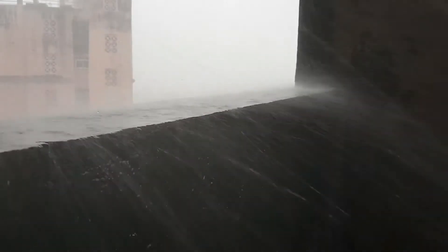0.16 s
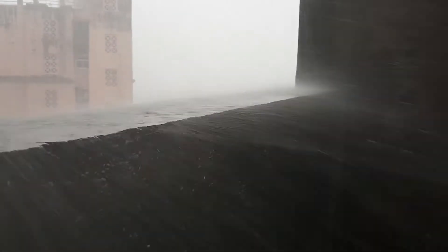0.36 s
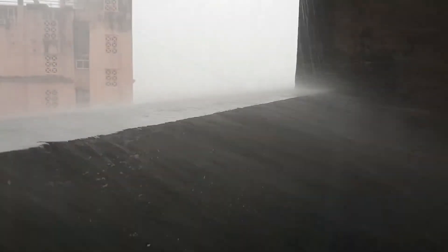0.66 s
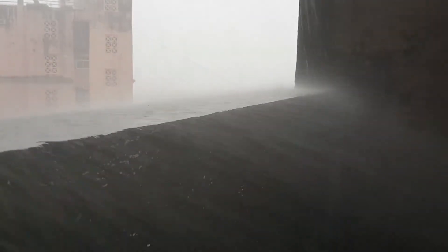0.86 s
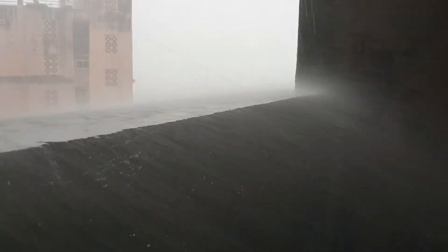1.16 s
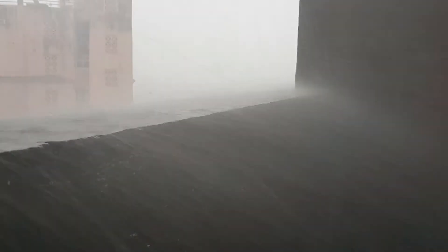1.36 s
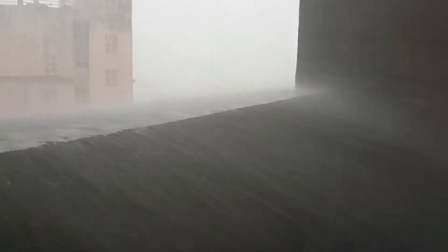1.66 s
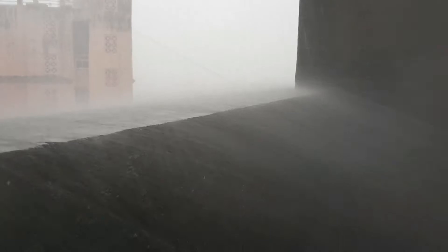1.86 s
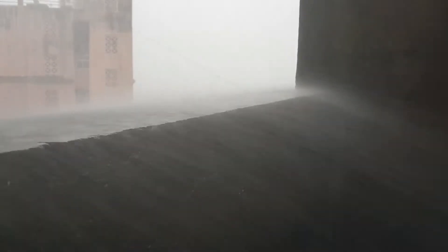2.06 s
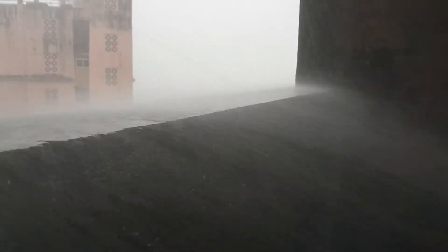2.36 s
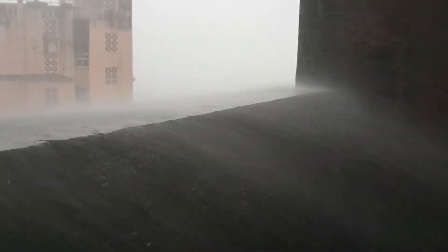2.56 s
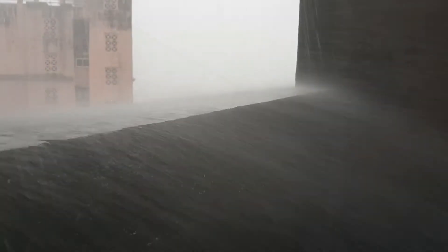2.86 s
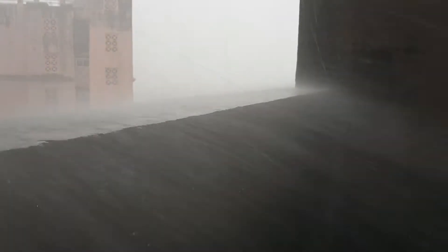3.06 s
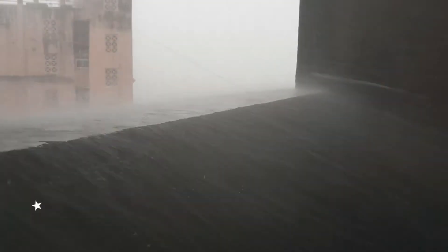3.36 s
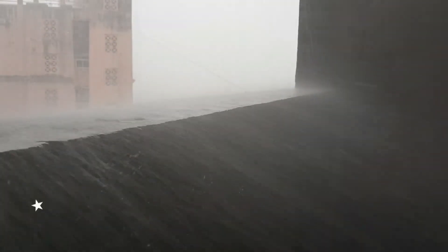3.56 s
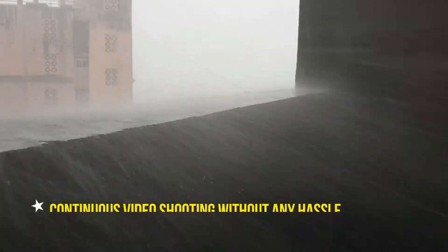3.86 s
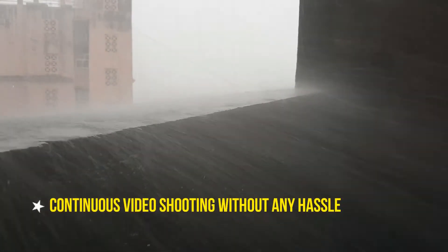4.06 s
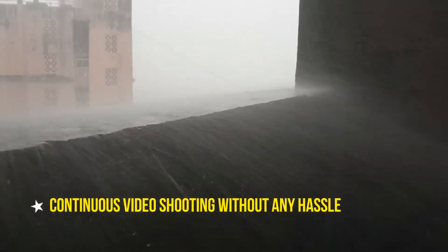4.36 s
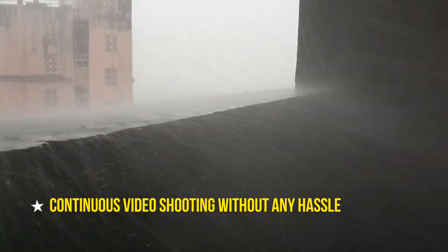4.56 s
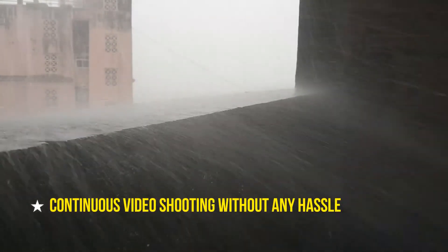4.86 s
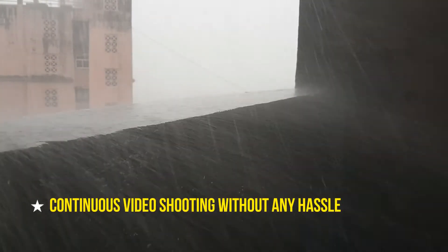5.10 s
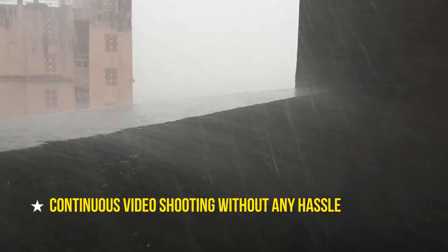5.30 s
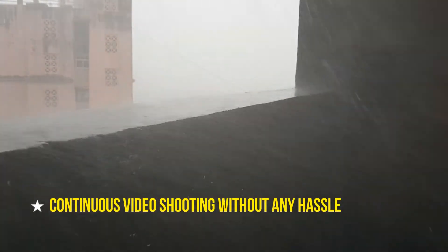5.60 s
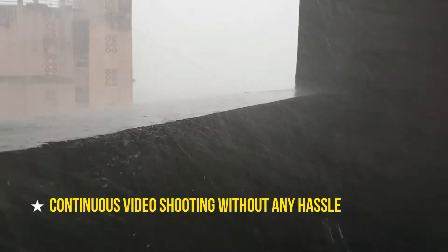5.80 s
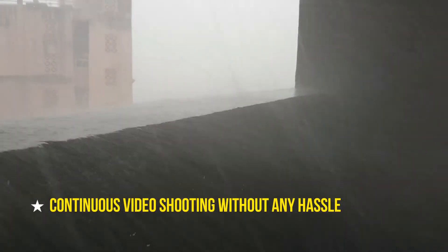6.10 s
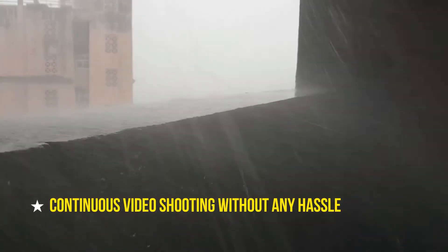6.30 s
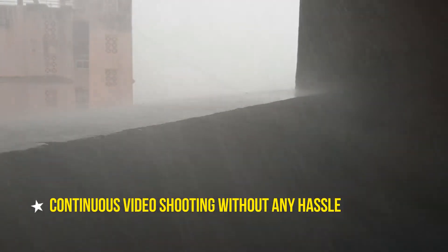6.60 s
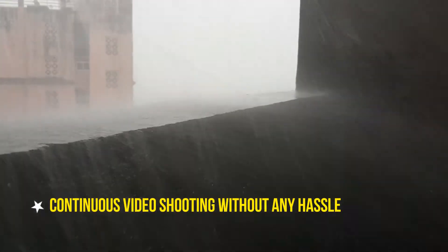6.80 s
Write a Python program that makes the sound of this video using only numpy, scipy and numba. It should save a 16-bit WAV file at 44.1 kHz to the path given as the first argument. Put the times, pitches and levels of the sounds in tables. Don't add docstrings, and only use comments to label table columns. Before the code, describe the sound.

Wind-driven rain batters a handheld microphone, low hollow drum-like plops and sharp overloaded ticks on the left over dull, lumpy gusty buffeting.

```python
import sys
import numpy as np
from scipy import signal
from scipy.io import wavfile
from scipy.ndimage import uniform_filter1d
from numba import njit

SR = 44100
rng = np.random.default_rng(int(sys.argv[2]) if len(sys.argv) > 2 else 0)


def volts_from_db(level):
    exponent = np.asarray(level, float) / 20
    return 10 ** exponent


def transcribe(signal):
    frames = np.atleast_2d(signal).T
    limited = np.clip(frames, -1, 1)
    pcm = np.round(limited * 32767).astype(np.int16)
    wavfile.write(sys.argv[1], SR, pcm)


N = 306054


# start_s, ringing_ms
BIG_DROPS_BUILDING = [(.2534, 16), (0.272, 4.5), (0.4729, 6.9), (0.4806, 7.6), (.659, 7.3), (0.9034, 8.6),
                      (1.5232, 11), (1.6677, 4.3), (1.8225, 9.6), (1.886, 6.1), (2.1928, 3.4),
                      (2.2124, 10.1), (2.229, 5.6), (2.305, 11), (2.3296, 9.5), (2.472, 6.3), (2.5481, 6),
                      (2.599, 5.9), (2.7543, 2.8), (2.9357, 4.5), (2.9819, 4.9), (3.0578, 0.47),
                      (3.0864, 2.8), (3.1275, 3.7), (3.2863, 1.8), (3.4542, 6.6), (3.5695, 4.6),
                      (3.6399, 4.3)]
# start_s, ringing_ms
BIG_DROPS_DOWNPOUR = [(4.251, 7.6), (4.2731, 13), (4.2945, 2.4), (4.3876, 7.3), (4.4929, 5.7),
                      (4.5845, 4.5), (4.5972, 10), (4.6875, 8.2), (4.7184, 25), (4.873, 7.9), (5.067, 8.8),
                      (5.1016, 7.2), (5.1284, 8), (5.179, 7.1), (5.2056, 9.7), (5.9039, 5.7), (5.9534, 14),
                      (5.9818, 11), (6.0044, 9.5), (6.14, 15), (6.164, 16), (6.1838, 10.5), (6.4322, 8.7),
                      (6.5043, 13), (6.5836, 10), (6.6862, 16), (6.731, 6.4), (6.8079, 8), (6.854, 8.4),
                      (6.873, 7.8)]
# start_s, blow_db, ringing_ms
MIDDLING_DROPS_EARLY = [(.5065, 10, 1.9), (.641, 9.5, 12), (0.6755, 12.5, 5), (1.001, 11.5, 8.7),
                        (1.008, 11, 4.1), (1.1583, 12, 2.7), (1.188, 11, 3.6), (1.4992, 13, 0.99),
                        (1.5507, 10.5, 5.1), (1.8552, 10.5, 54), (1.9003, 12, 2.1), (1.911, 4.5, 1.4),
                        (2.0923, 11, 8.5), (2.109, 11.5, 1.5), (2.1191, 11.5, 8.8), (2.142, 13, 2.1),
                        (2.1994, -2.5, 6.5), (2.378, 12.5, 6), (2.959, 13, 1.4), (2.9754, 14, 0.88),
                        (2.9993, 8.5, 2.7), (3.073, 12, 11), (3.1622, 9.5, 7.8), (3.2639, 11, 4.6),
                        (3.575, 9.5, 4.8), (3.982, 10.5, 1.7), (3.996, 10, 8), (4.1502, 13, 8),
                        (4.222, 13, 2.1), (4.3499, 10, 13)]
# start_s, blow_db, ringing_ms
MIDDLING_DROPS_LATE = [(4.4104, 2.5, 7.4), (4.418, 12, 3), (4.47, 12.5, 5), (4.7699, 10.5, 3.3),
                       (4.9838, 12.5, 7.7), (5.0377, 11.5, 18), (5.0554, 9.5, 3.9), (5.1575, 13.5, 5.4),
                       (5.438, 8.5, 2.5), (5.4472, 12.5, 6.5), (5.4853, 12.5, 1.8), (5.5303, 10, 18),
                       (5.5583, 10, 8), (5.585, 12.5, 5.7), (5.684, 13, 7.5), (5.8209, 12, 8.6),
                       (5.8697, 12, 4.5), (5.8785, 15, 5.1), (5.8974, 12.5, 8.6), (5.9923, 16, 4.3),
                       (6.36, 9.5, 1.6), (6.417, 10, 23), (6.4414, 14, 41), (6.5203, 12, 3.8),
                       (6.601, 14, 6.8), (6.6094, 15.5, 5.3), (6.6482, 14, 1.6), (6.6573, 11, 22),
                       (6.7738, 13, 2.4), (6.7869, 9, 6.1)]


def left_slapping_drops():
    big = np.array(BIG_DROPS_BUILDING + BIG_DROPS_DOWNPOUR)
    start_s, ringing_ms = big.T
    blow_db = 15.5 + np.exp(-ringing_ms / 3.78) + 0.42 * rng.standard_normal(len(big))
    big_rows = np.transpose([start_s, blow_db, ringing_ms])
    rows = np.vstack([big_rows, MIDDLING_DROPS_EARLY, MIDDLING_DROPS_LATE])
    return rows[np.argsort(rows[:, 0])].T


# start_s, blow_db
LIGHT_DROPS_EARLY = [(.1269, 1.5), (.168, 7.5), (.3905, -4), (.4483, 2), (.591, 4.5), (.7419, 6),
                     (.7563, 7), (.7848, 10), (.9778, 10.5), (1.1053, 6), (1.2129, 8), (1.231, -1.5),
                     (1.2547, 7), (1.3676, 5), (1.427, 8.5), (1.4895, 5.5), (1.592, 9), (1.6318, 4.5),
                     (1.718, 11.5), (1.7771, 9), (1.8116, 2.5), (1.9209, 14.5), (2.0098, 7), (2.1692, 7),
                     (2.255, 5.5), (2.459, 6), (2.515, 4.5), (2.6404, 3), (2.7245, 4), (2.825, 9)]
# start_s, blow_db
LIGHT_DROPS_LATE = [(3.2462, 5.5), (3.3, 9), (3.3266, 7), (3.365, 1.5), (3.4107, 1.5), (3.4258, 9),
                    (3.5367, 3.5), (3.7336, 8.5), (3.9687, 9.5), (4.0638, 2), (4.368, 10), (4.5408, 7.5),
                    (4.614, 9), (4.7981, 8), (4.8333, 6.5), (4.8995, 4.5), (4.968, 4), (5.2856, 10.5),
                    (5.3408, 8.5), (5.466, 15.5), (5.508, 15), (5.6214, 1.5), (5.6551, 5), (5.6746, 10),
                    (5.772, 5), (6.0458, 11), (6.425, 10.5), (6.4888, 6), (6.5453, 14), (6.5718, 20)]
FAINT_DROPS = [.026, .054, .134, .2985, .323, .7253, 1.4501, 1.4712, 1.5837, 1.6521, 1.9791, 2.0263, 2.6829,
               2.9265, 3.114, 3.1791, 3.6574, 3.692, 3.7067, 3.7151, 3.9019, 3.9293, 4.0256, 4.0536, 4.0842,
               4.1155, 4.632, 5.2297, 5.2668, 5.3721]
MORE_FAINT_DROPS = [.211, .3764, 1.3975, 1.6879, 1.7883, 1.994, 2.1521, 2.4944, 2.61, 3.31, 3.6459, 4.008,
                    4.1437, 4.3047, 4.3268, 4.5614, 4.6223, 4.7432, 5.3043, 5.4114, 5.5005, 5.698, 5.7221,
                    5.7532, 5.8353, 5.9214, 5.9381, 6.5551, 6.7464, 6.83]


def left_small_drops():
    strays_per_s, stray_db, stray_spread_db = 12, -10, 16
    chance = rng.random((int(strays_per_s * N / SR), 2))
    strays = [(when * N / SR, stray_db + stray_spread_db * (size - 0.5)) for when, size in chance]
    faint = [(start_s, 2.5) for start_s in FAINT_DROPS + MORE_FAINT_DROPS]
    return LIGHT_DROPS_EARLY + LIGHT_DROPS_LATE + faint + strays


# start_s, level_db
LEFT_GUSTS = [(0, -24.5), (.3, -17.5), (1.37, -24), (1.85, -14.5), (2.7, -28), (3.0, -19.5), (3.4, -27.5),
              (3.68, -18.5), (3.85, -22), (4.03, -15), (4.35, -17.5), (4.85, -22), (5.12, -16), (5.35, -25),
              (5.55, -16.5), (6.3, -18), (6.55, -15), (6.94, -16.5)]
# start_s, pitch_hz
LEFT_FILM_PITCH = [
    (0, 512),
    (1.5, 483),
    (2.9, 522.5),
    (4.5, 499.2),
    (6.2, 491.3),
    (6.45, 443),
    (6.75, 407),
    (6.94, 519),
]


def left_port():
    slow_hz, = in_time(LEFT_FILM_PITCH)
    start_s, blow_db, ringing_ms = left_slapping_drops()
    tautness = 1 + 0.061 * np.exp(-ringing_ms / 3.78) + 0.03 * rng.standard_normal(len(start_s))
    pitch_hz = slow_hz[(start_s * SR).astype(int)] * tautness
    film_hz = uniform_filter1d(np.interp(np.arange(N) / SR, start_s, pitch_hz), size=2500)

    small = left_small_drops()
    taps = [(when, db, film_hz[int(when * SR)], 3.26) for when, db in small]
    heavy_rows = np.transpose([start_s, blow_db, pitch_hz, ringing_ms])
    heavy = slaps(heavy_rows, t60=0.054, rise_ms=0.2, boost=1.245, load=0.18)
    light = slaps(taps, t60=0.042, rise_ms=0.14, boost=0, load=0)
    patter = splash(start_s, blow_db) + volts_from_db(2.5) * splash(*np.transpose(small))

    buffet_db, stir_db = effort(LEFT_GUSTS, buffet_db=9.24, buffet_share=1.01,
                                stir_db=4.7, stir_share=0.81, wander_db=2.26)
    stir_db = stir_db + 0.5 * rainfall(start_s)
    wind = gusts(buffet_db, stir_db, film_hz, width_hz=109, swell_db=2, edge_hz=324, lumpy_db=2, spray_db=-29)
    return heavy + light + patter + wind


# start_s, blow_db
RIGHT_DROPS = [(.225, -2), (1.2638, -13.5), (1.2701, -1), (1.2988, -4), (1.3185, -5), (1.33, -3),
               (1.3453, -4.5), (1.3838, 0), (1.608, -4.5), (1.63, -4), (1.7124, -9), (1.852, -15),
               (1.9498, -6), (1.9572, -6.5), (2.01, -9), (2.037, -5), (2.086, -6.5), (2.242, 1),
               (2.4113, -3), (2.5119, -1), (2.5262, -2.5), (2.5424, -2), (2.685, -7), (2.884, -4.5),
               (3.0266, -3.5), (3.114, -8), (4.757, -4.5), (5.465, -3), (6.3713, -4.5)]
# start_s, level_db
RIGHT_GUSTS = [(0, -32.5), (1.05, -33), (1.33, -23), (1.6, -30.5), (2.0, -24.5), (2.17, -31.5),
               (2.45, -24.5), (2.95, -30), (3.45, -29), (3.65, -33.5), (4.6, -39.5), (4.76, -32),
               (5.15, -42), (5.42, -31), (5.97, -40), (6.3, -31), (6.48, -31), (6.94, -34.5)]


def right_port():
    film_hz = 1061
    drops = [(start_s, db + 8.0, film_hz, 9.0) for start_s, db in RIGHT_DROPS]
    rings = butter(slaps(drops, t60=0.084, rise_ms=0.11, boost=0, load=0), 950, "low", order=3)
    patter = volts_from_db(-0.5) * splash(*np.transpose(RIGHT_DROPS))
    buffet_db, stir_db = effort(RIGHT_GUSTS, buffet_db=10.1, buffet_share=0.94,
                                stir_db=4.5, stir_share=1.28, wander_db=3.2)
    wavering_hz = film_hz * (1 + 0.015 * drift(38))
    wind = gusts(buffet_db, stir_db, wavering_hz,
                 width_hz=143.5, swell_db=14.5, edge_hz=481, lumpy_db=3, spray_db=-102)
    return rings + patter + wind


def slaps(drops, t60, rise_ms, boost, load):
    out = np.zeros(N + SR)
    t = np.arange(SR // 16) / SR
    luck = rng.standard_normal((len(drops), 13))
    for (start_s, db, hz, ringing_ms), (lean, *slips) in zip(drops, luck):
        at, lasts = round(start_s * SR), ringing_ms / 1000
        smothering = 0.14 + 0.43 / (1 + np.exp(np.clip((t - lasts) * 2500, -40, 40)))
        taut = 0.93 * np.exp(-t / 0.00028)
        slipping = 0.13 * np.interp(t * hz, 0.762 * np.arange(12), slips)
        phase = 2 * np.pi * np.cumsum(hz * (1 + taut + slipping)) / SR
        rise = 1 - np.exp(-t * 1000 / rise_ms)
        ring = volts_from_db(-60 * t / t60) * smothering * rise * np.sin(phase)
        blow = volts_from_db(db + boost * max(db - 8.5, 0))
        spread = np.maximum(t - lasts + 0.005, 0) / 0.005
        leaning = (spread * np.exp(1 - spread)) ** 2
        weight = load * max(db - 10.5, 0) * max(lean + 1.93, 0) * leaning
        out[at:at + len(t)] += blow * ring + weight
    return out[:N]


def splash(start_s, blow_db):
    hits = np.zeros(N)
    hits[(start_s * SR).astype(int)] = volts_from_db(blow_db)
    fading = signal.lfilter([1], [1, -np.exp(-1 / (0.0037 * SR))], hits + 1e-18)
    patter = rng.standard_normal(N) * volts_from_db(3.4 * drift(400))
    return volts_from_db(-30.5) * fading * rms_one(butter(butter(patter, 900, "high"), 2300, "low"))


def gusts(buffet_db, stir_db, film_hz, width_hz, swell_db, edge_hz, lumpy_db, spray_db):
    lumps = lumpy_db * (drift(15.9) + drift(51.5))
    white = rng.standard_normal(N)
    swell = volts_from_db(swell_db) * butter(white, 50, "low", order=1)
    air = butter(white, edge_hz, "low", order=1) + swell
    buffet = rms_one(butter(air, 0.99 * np.mean(film_hz), "low", order=4))

    sizes = volts_from_db(5.93 * np.minimum(rng.exponential(1, N), 4))
    landing = rng.random(N) < 900 / SR
    droplets = rms_one(landing * sizes * rng.choice([-1, 1], N))
    push = volts_from_db(stir_db + lumps) * (rng.standard_normal(N) + 1.137 * droplets)
    turn, r = 2 * np.pi * film_hz / SR, np.exp(-np.pi * width_hz / SR)
    stirred = resonate(resonate(push, turn, r), turn, r ** 3.2)
    stirred *= np.std(push) / np.std(stirred)

    spray = rms_one(butter(butter(white + 0.33 * droplets, 390, "high"), 800, "low"))
    buffeting = volts_from_db(buffet_db + 0.82 * lumps + 1.2) * (buffet + volts_from_db(spray_db) * spray)
    return buffeting + volts_from_db(-3.0) * stirred


@njit
def resonate(x, turn, r):
    y = np.zeros(len(x))
    for i in range(2, len(x)):
        y[i] = x[i] + 2 * r * np.cos(turn[i]) * y[i - 1] - r * r * y[i - 2]
    return y


def effort(gust_table, buffet_db, buffet_share, stir_db, stir_share, wander_db):
    gust_db, = in_time(gust_table)
    mean = gust_db.mean()
    swing = gust_db - mean
    buffeting_db = mean + buffet_db + buffet_share * swing
    stirring_db = mean + stir_db + stir_share * swing + wander_db * drift(4.04)
    return buffeting_db, stirring_db


def rainfall(start_s):
    hits = np.zeros(N)
    hits[(start_s * SR).astype(int)] = 1
    span = int(0.042 * SR)
    density = uniform_filter1d(uniform_filter1d(hits, size=span), size=span)
    return np.tanh(density / density.mean() - 1)


def recorder_hiss(shape):
    level_db = -63.5 + np.array([[0], [-13]]) + 1.5 * drift(6.0)
    return volts_from_db(level_db) * butter(rng.standard_normal(shape), [11500, 15600], "band")


def in_time(rows):
    start_s, *columns = np.transpose(rows)
    return [np.interp(np.arange(N) / SR, start_s, column) for column in columns]


def rms_one(x):
    return x / np.sqrt(np.mean(x ** 2) + 1e-20)


def butter(x, hz, kind, order=2):
    return signal.sosfilt(signal.butter(order, hz, kind, fs=SR, output="sos"), x)


def drift(rate_hz):
    return rms_one(butter(rng.standard_normal(N + SR), rate_hz, "low")[SR:])


def scene():
    return np.array([left_port(), right_port()])


def roll_off(x):
    return signal.sosfilt(signal.butter(12, 16100, fs=SR, output="sos"), x)


def record(dry):
    top = np.array([[1], [1.1]])
    stopped = np.clip(dry, -top, top)
    give = 0.0021 * (dry - stopped)
    noise = butter(rng.standard_normal(dry.shape), [700, 5000], "band", order=1)
    speed = np.abs(np.gradient(dry, axis=1)) * 14
    rattle = 0.045 * noise * speed * (dry != stopped)
    capsule = stopped + give + rattle
    coupled = butter(butter(capsule, 83.2, "high"), 5200, "low", order=1)
    return roll_off(np.clip(coupled + recorder_hiss(dry.shape), -1, 1))


dry = scene()
out = record(dry)
transcribe(out)
```